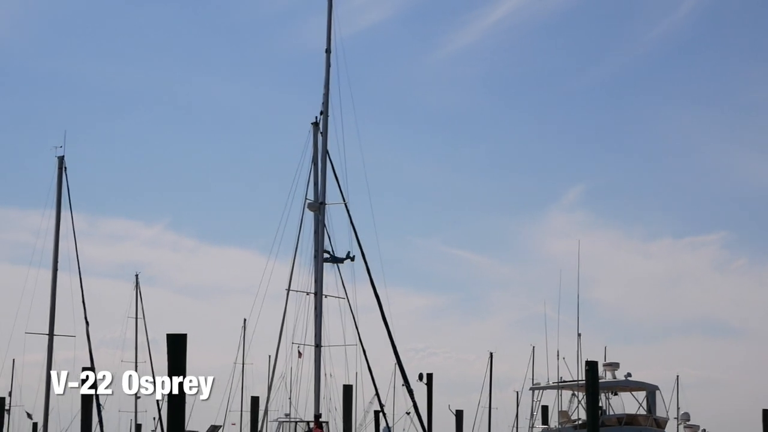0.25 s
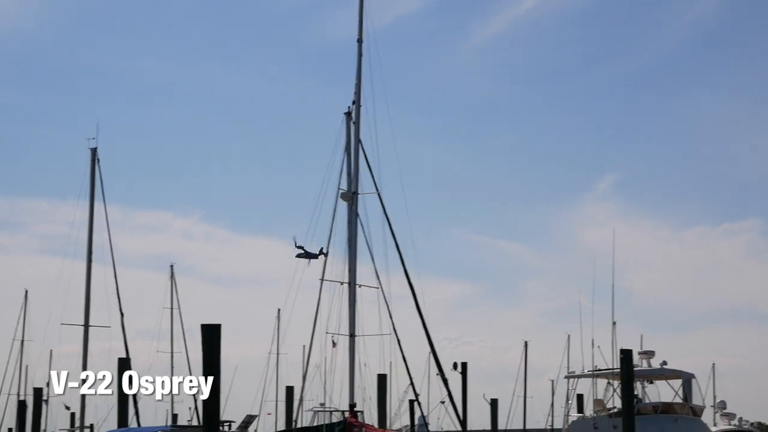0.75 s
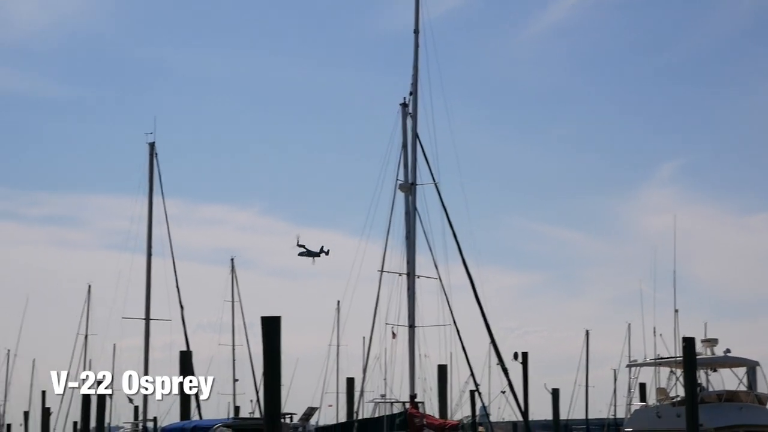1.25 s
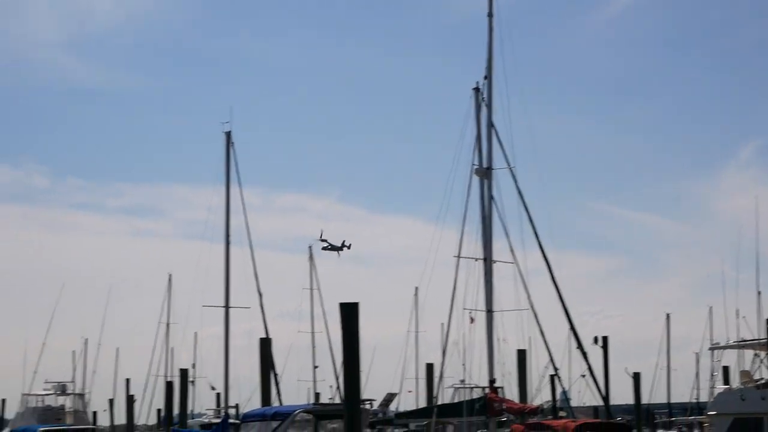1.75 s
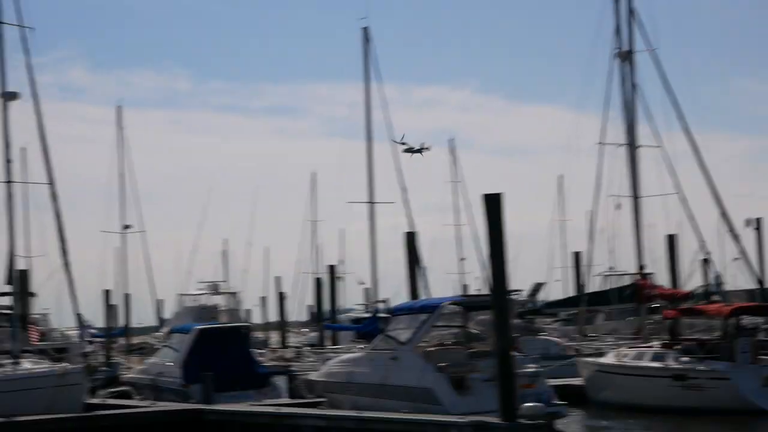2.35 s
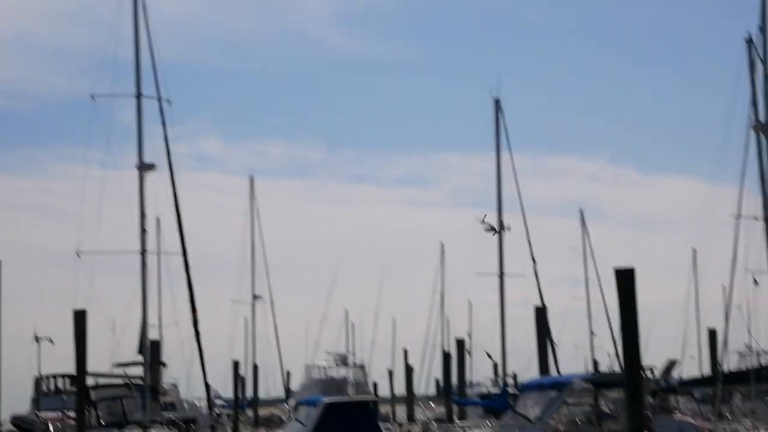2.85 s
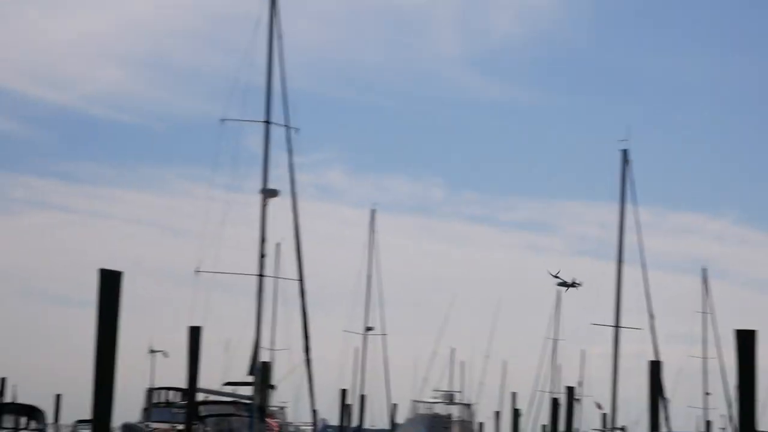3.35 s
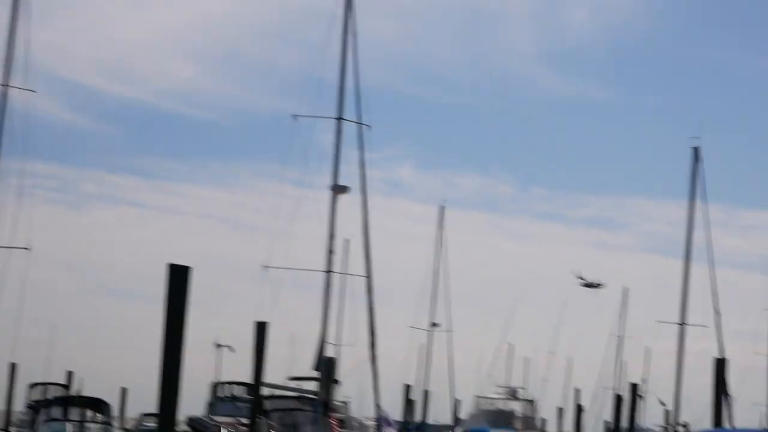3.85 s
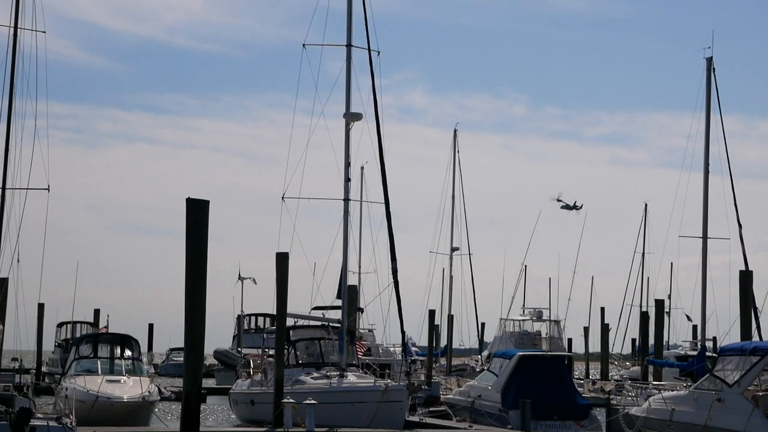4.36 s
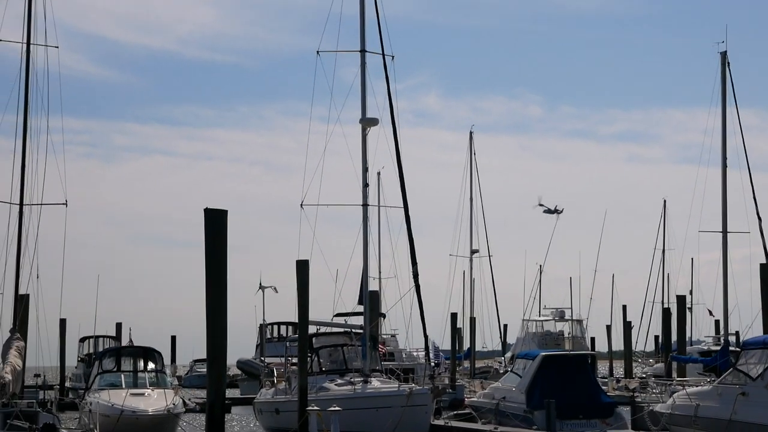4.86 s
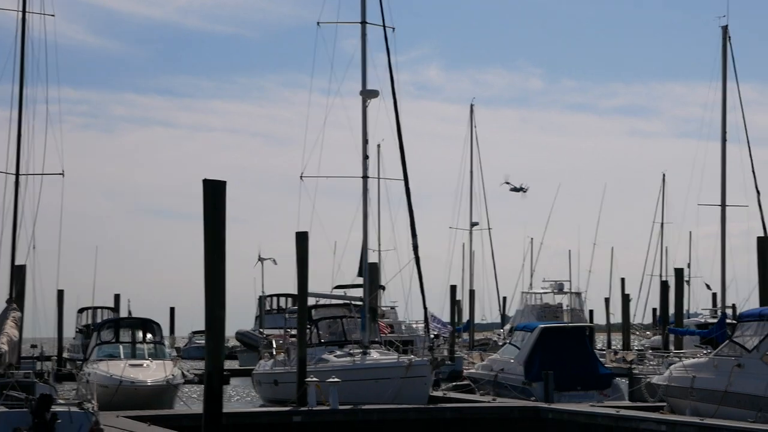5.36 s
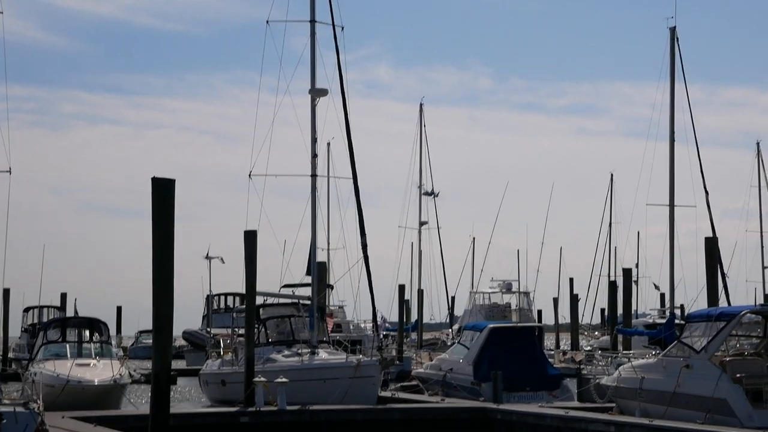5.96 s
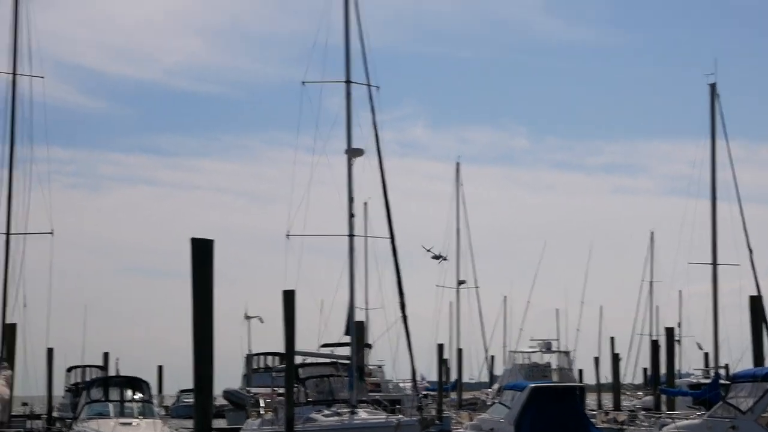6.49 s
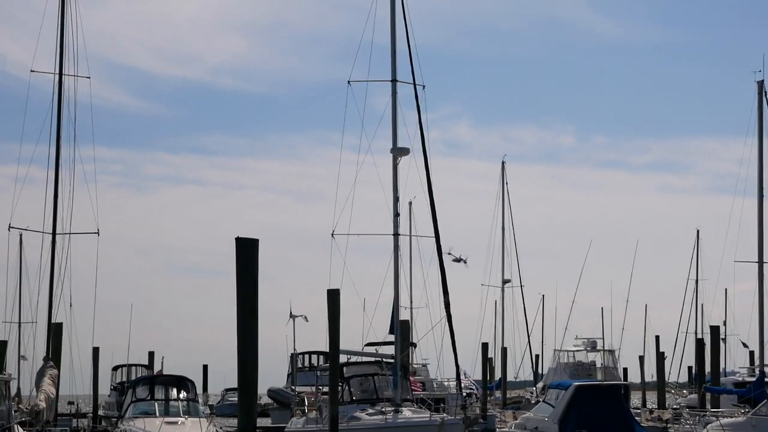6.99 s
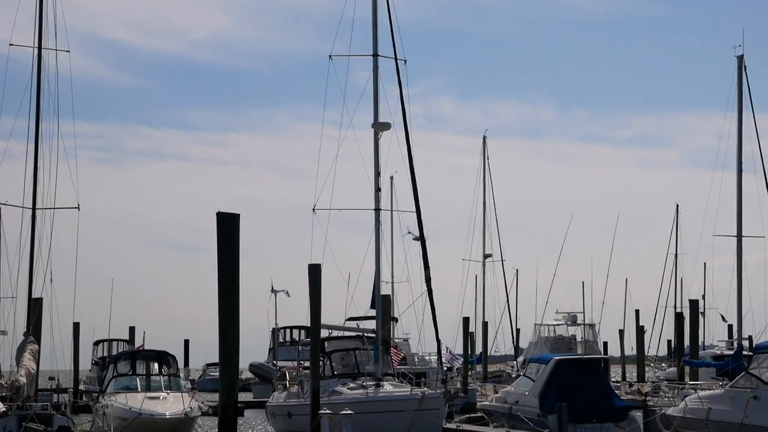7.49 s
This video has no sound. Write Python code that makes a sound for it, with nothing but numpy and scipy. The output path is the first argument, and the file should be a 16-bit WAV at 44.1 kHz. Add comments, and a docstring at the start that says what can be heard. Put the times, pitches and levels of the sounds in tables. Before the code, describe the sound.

Wind buffets the microphone from start to finish, a loud, low rumble with irregular gusts and soft thumps. Beneath it a distant rotor aircraft holds a dull, slightly throbbing drone, and a very faint hiss runs throughout. Tiny dry ticks are scattered from the first second. Small boat fittings clink faintly from about 0.8 seconds, clustering between 3.5 and 4.3 seconds, and ropes ping lightly on metal masts from 1.6 seconds, most clearly at 2.2. Near 2.6 seconds fingers slide softly over the camera and its button snaps in and out with a close, sharp double click. The wind eases briefly around 3.5 seconds, then returns in shorter puffs, with a strong one near 6.2. A small bird gives three thin, barely audible whistles at about 4.8, 5.6 and 7.6 seconds. Wind and drone continue to the end at about 7.7 seconds.

```python
"""A rotor aircraft recedes over a windy marina, its drone under gusts that buffet a camera's microphone.
A faint hiss runs throughout. Lone eddies thump and dry ticks sound from the first second on.
Small fittings clink from 0.8 s; halyards ping on aluminium masts from 1.6 s.
Near 2.6 s fingers slide over the camera and its button clicks in and out.
From 4.8 s a small bird whistles three times."""
import sys
import numpy as np
from scipy import signal
from scipy.fft import rfft, irfft, next_fast_len
from scipy.io import wavfile
from scipy.ndimage import uniform_filter1d, minimum_filter1d, map_coordinates

SR = 44100
rng = np.random.default_rng(int(sys.argv[2]) if len(sys.argv) > 2 else 0)


def put_to_file(sound):
    """Save the sound as 16-bit audio at rate SR, in the file named by the first command-line argument."""
    columns = np.atleast_2d(sound).T  # one column per channel
    safe = np.clip(columns, -1, 1)
    whole_steps = np.round(safe * 32767)
    wavfile.write(sys.argv[1], SR, whole_steps.astype(np.int16))


N = 340893


def amp(db):
    return 10 ** (np.asarray(db) / 20)


def unit_rms(x):
    return x / np.sqrt(np.mean(x ** 2) + 1e-20)


def at_hz(points, hz):
    """Interpolate (Hz, value) rows on a log frequency axis."""
    knots_hz, values = np.transpose(points)
    return np.interp(np.log(hz + 1), np.log(knots_hz + 1), values)


def at_time(points, t):
    """Interpolate (seconds, value) rows."""
    return np.interp(t, *np.transpose(points))


def wobble(knots_per_s):
    """Smooth random curve, N samples."""
    knots = rng.standard_normal(int(N * knots_per_s / SR) + 4)
    return map_coordinates(knots, [np.arange(N) * knots_per_s / SR])


def filtered(x, response):
    """Apply the gain response(hz) by FFT."""
    size = next_fast_len(N + 8192)
    return irfft(rfft(x, size) * response(np.fft.rfftfreq(size, 1 / SR)), size)[..., :N]


def noise(spectrum):
    """Noise of rms 1, coloured by (Hz, dB) rows."""
    return unit_rms(filtered(rng.standard_normal(N), lambda hz: amp(at_hz(spectrum, hz))))


def add(track, start_s, sound):
    part = track[round(start_s * SR):][:len(sound)]
    part += sound[:len(part)]


# Air stream between gusts. Each row: time in seconds, level in dB re mean wind.
BREEZE_DB = [(0.0, -1.5), (1.1, -2.0), (2.2, -3.0), (2.85, -1.5), (3.3, 0), (3.57, -6.5), (4.2, -4.5),
             (4.6, -6.5), (5.2, -3.5), (5.95, -5.5), (6.3, -4), (6.9, -0.5), (7.73, -1)]
# Gusts. Each row: centre in seconds, peak in dB re mean wind, width at -10 dB in seconds.
GUST_PUFFS = [(0.038, 1.5, 0.26), (0.19, 4, 0.15), (0.375, 2.5, .13), (0.47, 5, 0.09), (0.6, 1, 0.23),
              (0.781, -1.5, 0.16), (0.98, -2.5, 0.4), (1.23, 1, 0.13), (1.363, 2.5, 0.22), (1.498, 2, 0.11),
              (1.684, 0, 0.33), (1.888, 2, 0.08), (2.072, 1.5, 0.19), (2.274, 2, 0.11), (2.344, 3.5, 0.11),
              (2.443, 3, 0.2), (2.646, 4, 0.39), (2.968, 1, 0.17), (3.39, -4, 0.33), (3.916, 1.5, 0.24),
              (4.085, 0, 0.12), (4.325, 0, 0.19), (4.375, 2.5, 0.1), (4.514, 0, 0.07), (4.684, 1, 0.09),
              (4.737, -1, 0.09), (4.836, 3.5, 0.09), (5.04, 0.5, 0.1), (5.332, 2, 0.09), (5.444, -1, 0.19),
              (5.625, -4.5, 0.28), (5.816, -0.5, 0.02), (6.069, 3, 0.06), (6.187, 5.5, 0.12),
              (6.521, -.5, 0.34), (6.751, 2, 0.07), (7.018, 1, 0.1), (7.206, -0.5, 0.1), (7.368, 1, 0.26),
              (7.53, 1, 0.05)]


def airstream_db(t, steepness=3.07):
    """Wind strength: breeze and gusts add in power."""
    centre_s, peak_db, width_s = np.transpose(GUST_PUFFS)[..., None]
    puffs_db = peak_db - 10 * np.abs(2 * (t - centre_s) / width_s) ** steepness
    gusts = np.linalg.norm(amp(puffs_db), axis=0)
    return 20 * np.log10(np.hypot(amp(at_time(BREEZE_DB, t)), gusts))


# Mean buffeting. Each row: frequency in Hz, relative density in dB.
EDDY_SPECTRUM = [(20, -20.5), (50, -6), (100, 0.5), (200, -3), (400, -11.5), (800, -29.5), (1500, -48),
                 (2500, -63), (4000, -68.5), (4800, -84), (7000, -99)]
# Response to gusts. Each row: frequency in Hz, dB per dB of air stream.
GUST_SENSITIVITY = [(100, 0.16), (250, 0.67), (600, 1.64), (1500, 2), (4000, 1.65)]
# Big slow eddies. Each row: time in seconds, level in dB.
RUMBLE_DB = [(0, -17), (1.75, -16.5), (2.7, -20), (3.45, -20), (4.05, -16), (6.1, -16), (6.9, -18),
             (7.73, -17)]
# Wind treble. Each row: time in seconds, gain in dB.
TREBLE_DB = [(0, 4), (.7, 1), (2.5, 2.5), (3.5, 0), (5, -1.5), (7.73, -2)]
# Reach of that gain. Each row: frequency in Hz, share of the dB applied.
TREBLE_SHARE = [(900, 0.0008), (2800, 0.94)]


def wind(lumps_db=1.25, heave_db=2.2, patches_db=1.0):
    """Eddies of unequal size beat on the diaphragm; stronger gusts brighten them."""
    lumps = amp(lumps_db * (wobble(30) + wobble(90) + wobble(300)))
    eddies = filtered(lumps * rng.standard_normal(N), lambda hz: amp(at_hz(EDDY_SPECTRUM, hz)))
    hz, t, spectra = signal.stft(unit_rms(eddies), SR, nperseg=1024, noverlap=768)
    rumble_db = at_time(RUMBLE_DB, t)
    mean_db = rumble_db.mean()
    heave = np.interp(t * SR, np.arange(N), wobble(7))
    sensitivity = at_hz(GUST_SENSITIVITY, hz)[:, None]
    rumble_share = np.clip(1 - sensitivity, 0, 1)
    swing_db = sensitivity * airstream_db(t) + rumble_share * (rumble_db - mean_db + heave_db * heave)
    swing_db += at_hz(TREBLE_SHARE, hz)[:, None] * at_time(TREBLE_DB, t)
    patches = uniform_filter1d(rng.standard_normal(spectra.shape), size=6, axis=0)
    patches = unit_rms(uniform_filter1d(patches, size=8, axis=1))
    gain = amp(mean_db + swing_db + patches_db * patches)
    return signal.istft(spectra * gain, SR, nperseg=1024, noverlap=768)[1][:N]


# Rotor drone. Each row: frequency in Hz, relative density in dB.
DRONE_SPECTRUM = [(20, -25.5), (45, -5), (90, 4.5), (150, 3.5), (300, -5.5), (600, -26), (1200, -42.5),
                  (2500, -76)]
# Exhaust rush. Each row: frequency in Hz, relative density in dB.
EXHAUST_SPECTRUM = [(500, -18.5), (1000, 1.5), (2200, -6.5), (3000, -20.5), (4500, -35)]
# Exhaust strength. Each row: time in seconds, level in dB.
EXHAUST_DB = [(0, -62.5), (2.5, -64), (3.6, -59.5), (4.5, -62), (5.6, -56.5), (6.5, -58), (7.73, -61.5)]


def aircraft(level_db=-23, blade_hz=18.5, throb_depth=0.17):
    """Distant dull roar, throbbing at each blade pass, plus a steadier exhaust rush."""
    blade_phase = 2 * np.pi * np.cumsum(blade_hz * (1 + 0.02 * wobble(1.3))) / SR
    throb = 1 + throb_depth * np.cos(blade_phase)
    roar = amp(level_db + 1.4 * wobble(2.5)) * throb * noise(DRONE_SPECTRUM)
    rush_db = at_time(EXHAUST_DB, np.arange(N) / SR) + 1.2 * wobble(7.4)
    return roar + amp(rush_db) * noise(EXHAUST_SPECTRUM)


# Hiss colour. Each row: frequency in Hz, relative density in dB.
HISS_SPECTRUM = [(2650, -24), (4500, 1), (5370, 1), (5710, -9), (11500, -15), (15500, -15)]
# Hiss strength. Each row: time in seconds, level in dB.
HISS_DB = [(0, -91), (.6, -95), (2.4, -93.5), (3.4, -88), (7.73, -90.5)]


def hiss():
    """Faint, slightly flickering noise floor."""
    level_db = at_time(HISS_DB, np.arange(N) / SR) + 1.5 * wobble(4.4) + 1.2 * wobble(14)
    return amp(level_db) * noise([(2000, -20), *HISS_SPECTRUM])


# Lone sharp eddies. Each row: start in seconds, level in dB.
LONE_EDDIES = [(0.218, -12), (0.361, -12), (0.485, -12), (0.575, -10.5), (0.897, -15.5), (1.301, -13),
               (1.669, -13), (2.248, -14), (2.319, -11), (2.335, -12), (2.418, -11), (2.478, -12),
               (2.931, -10), (2.961, -11), (3.315, -13.5), (4.349, -11), (4.364, -8.5), (4.372, -10),
               (4.67, -15), (4.842, -12), (5.319, -11.5), (5.441, -15.5), (6.188, -9), (6.613, -8),
               (6.728, -12), (6.747, -8), (6.789, -13), (7.013, -8)]


def thumps(knee_hz=320, breakup=0.06):
    """A small eddy flicks the diaphragm and breaks up, brighter than the mean buffeting."""
    def response(hz):
        return amp(at_hz(EDDY_SPECTRUM, hz)) * 1j * hz / (knee_hz + hz)

    flicks, t = np.zeros(N), np.arange(SR // 25) / SR
    for start_s, db in LONE_EDDIES:
        burst = breakup * rng.standard_normal(len(t)) * np.exp(-((t - 0.003) / 0.01) ** 2)
        burst[0] += rng.choice([-1, 1])
        add(flicks, start_s, amp(db) * burst)
    impulse_peak = np.abs(filtered(signal.unit_impulse(N), response)).max()
    return filtered(flicks, response) / impulse_peak


# Dry plastic. Each row: frequency in Hz, relative density in dB.
DRY_SPECTRUM = [(1500, -22), (3800, 1), (8000, -5.5), (11500, -11.5), (15500, -18)]
# Ticks. Each row: start in seconds, level in dB, treble gain in dB.
DRY_TICKS = [(0.5745, -53, -2), (1.3635, -64, -4), (2.169, -51, -15), (2.3186, -59, -10),
             (2.4559, -55, -10), (2.815, -55.5, -8), (2.932, -57, -15.5), (3.0045, -58, -16),
             (3.0235, -57.5, -14.5), (3.0824, -58, -16), (3.1447, -57, -11), (3.5055, -58, 0),
             (3.6117, -61, 0), (4.1355, -63.5, -5.5), (4.3707, -57.5, -0.5), (4.9406, -59, -14.5),
             (4.948, -60.5, -14), (5.121, -52, -18), (5.4535, -53.5, -4.5), (5.514, -58, -11.5),
             (7.0128, -61, -2.5)]


def ticks(faint_count=40, crossover_hz=5800, t60_s=0.016):
    """Tiny dry noise puffs, some duller, with fainter ones at random times."""
    low_gate, high_gate = np.zeros((2, N))
    t = np.arange(SR // 50) / SR
    faint_ticks = rng.random((faint_count, 3)) * [N / SR, 8, 10] + [0, -74, -10]
    for start_s, db, treble_db in [*DRY_TICKS, *faint_ticks]:
        puff = amp(db - 60 * t / t60_s) * (1 - np.exp(-t / 0.0006))
        add(low_gate, start_s, puff)
        add(high_gate, start_s, amp(treble_db) * puff)
    grit = noise(DRY_SPECTRUM)
    lows = filtered(grit, lambda hz: 1 / (1 + (hz / crossover_hz) ** 10))
    return low_gate * lows + high_gate * (grit - lows)


# Distant small fittings. Each row: start in seconds, level in dB, mode in Hz.
FITTING_TAPS = [(.76, -69, 5150), (1.633, -69, 4780), (2.05, -57.5, 3600), (3.46, -61.5, 3510),
                (3.664, -60, 3420), (4.075, -62, 3400), (4.14, -61, 3800), (4.23, -59.5, 3400),
                (4.288, -59.5, 3780), (5.698, -67, 4750), (6.237, -58, 4850)]


def clinks(ring_t60_s=0.04, tick_t60_s=0.015):
    """Shackles and clips tap: one short, rough mode each, over a dry tick."""
    track, t = np.zeros(N), np.arange(SR // 12) / SR
    grit = noise(DRY_SPECTRUM)
    attack = 1 - np.exp(-t / 0.0018)
    for start_s, db, hz in FITTING_TAPS:
        ring = amp(-60 * t / ring_t60_s) * np.sin(2 * np.pi * hz * t)
        tick = 0.55 * amp(-60 * t / tick_t60_s) * grit[round(start_s * SR):][:len(t)]
        add(track, start_s, amp(db) * attack * (ring + tick))
    return track * amp(4.7 * wobble(500))


# Mast tube modes. Each row: frequency in Hz, T60 in seconds.
MAST_MODES = [(2670, 0.75), (4830, 0.15)]
# Rope slaps. Each row: start in seconds, level in dB, upper mode gain in dB.
HALYARD_SLAPS = [(1.627, -68, -5.5), (2.22, -54, -9), (3.485, -66.5, -10), (4.542, -67.5, -6),
                 (4.783, -82, 7.5), (6.19, -64.5, -30), (6.83, -71.5, -13)]


def halyards(beat_hz=15.5):
    """A rope slap rings two mast modes; the lower beats, as close modes do."""
    track, t = np.zeros(N), np.arange(SR // 3) / SR
    (low_hz, low_t60_s), (high_hz, high_t60_s) = MAST_MODES
    attack = 1 - np.exp(-t / 0.004)
    beating = 1 - 0.6 * np.cos(2 * np.pi * beat_hz * t)
    lower = amp(-60 * t / low_t60_s) * np.sin(2 * np.pi * low_hz * t) * beating
    for start_s, db, upper_db in HALYARD_SLAPS:
        upper = amp(upper_db - 60 * t / high_t60_s) * np.sin(2 * np.pi * high_hz * t)
        add(track, start_s, amp(db) * attack * (lower + upper))
    return track * amp(1.2 * wobble(35) + 2.4 * wobble(400))


# Skin sliding on plastic. Each row: frequency in Hz, relative density in dB.
FRICTION_SPECTRUM = [(2000, -7.5), (4000, 3), (8000, 0), (12000, -5), (15500, -7.5)]
# Camera body modes. Each row: frequency in Hz, relative level in dB, T60 in seconds.
BODY_MODES = [(2500, -1.5, 0.01), (3850, 5.5, 0.0079), (5250, -12, .01), (6270, -15, 0.04),
              (7420, -11, 0.025), (8650, -12, 0.017), (9300, -16, .02), (11250, -17, 0.027)]


def body_response(hz):
    """Gain of the plastic body: one resonance peak per mode."""
    return 0.12 + sum(amp(0.42 * db) / (1 + ((hz - mode_hz) / 260) ** 2) for mode_hz, db, _ in BODY_MODES)


def finger_slide(start_s=2.56, level_db=-65, rise_s=0.07, hold_s=0.17, fall_s=0.3):
    """Fingers cross the camera body in small slips; rise and fall times span 20 dB."""
    t = np.arange(N) / SR - start_s - rise_s
    fade_db = 20 * np.maximum(0, np.maximum(-t / rise_s, (t - hold_s) / fall_s))
    slips_db = 1.6 * wobble(40) + 3.2 * wobble(700)
    friction = unit_rms(filtered(noise(FRICTION_SPECTRUM), lambda hz: 1.5 + body_response(hz)))
    return amp(level_db - fade_db + slips_db) * friction


# Camera button. Each row: start in seconds, level in dB.
BUTTON_SNAPS = [(2.638, -28.5), (2.691, -37.5)]


def button(crack_t60_s=0.011, rattle_t60_s=0.22):
    """The button snaps in and out, ringing and rattling the plastic body."""
    rings, gate = np.zeros((2, N))
    t = np.arange(SR // 8) / SR
    crack_and_rattle = 0.45 * amp(-60 * t / crack_t60_s) + 0.1 * amp(-60 * t / rattle_t60_s)
    for start_s, db in BUTTON_SNAPS:
        onset = amp(db) * (1 - np.exp(-t / 0.00035))
        for hz, mode_db, t60_s in BODY_MODES:
            decay = amp(mode_db + rng.normal(0, 1.5) - 60 * t / t60_s)
            add(rings, start_s, onset * decay * np.sin(2 * np.pi * hz * t))
        add(gate, start_s, onset * crack_and_rattle)
    grit = unit_rms(filtered(noise(DRY_SPECTRUM), body_response))
    return rings + gate * grit


# Bird calls. Each row: start in seconds, length in seconds, level in dB, starting pitch in Hz.
WHISTLES = [(4.829, 0.083, -77.5, 4000), (5.62, .27, -70, 4050), (7.6, 0.12, -70, 4090)]


def bird():
    """Thin whistles: slow swell, slight pitch lift, quicker fade, roughened by the air they cross."""
    track = np.zeros(N)
    for start_s, length_s, db, hz in WHISTLES:
        t = np.arange(0, length_s, 1 / SR)
        progress = t / length_s
        swell = np.abs(np.sin(np.pi * progress ** 1.6)) ** 1.3
        phase = 2 * np.pi * hz * t * (1 + 0.004 * progress ** 3)
        add(track, start_s, amp(db) * swell * np.sin(phase))
    return track * amp(2.2 * wobble(120))


def scene():
    rigging = halyards() + clinks() + ticks()
    return (wind() + thumps() + aircraft() + rigging + bird() + button() + finger_slide() + hiss())[None]


def record(dry, threshold=0.85, fade_in_s=0.01, cutoff_hz=15700):
    """Look-ahead limiter, fade-in, brick-wall low-pass."""
    needed_gain = np.minimum(1, threshold / (np.abs(dry) + 1e-9))
    gain = uniform_filter1d(minimum_filter1d(needed_gain, size=SR // 25), size=SR // 25)
    fade_in = np.minimum(1, np.arange(N) / (fade_in_s * SR))
    return filtered(dry * gain * fade_in, lambda hz: hz < cutoff_hz)


dry = scene()
out = record(dry)
put_to_file(out)
```